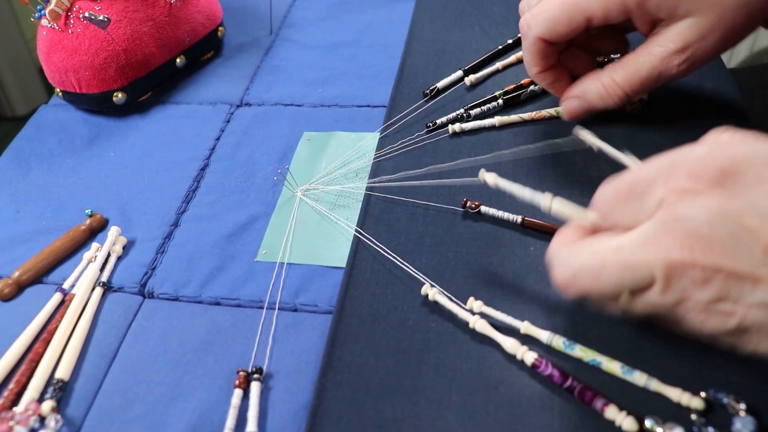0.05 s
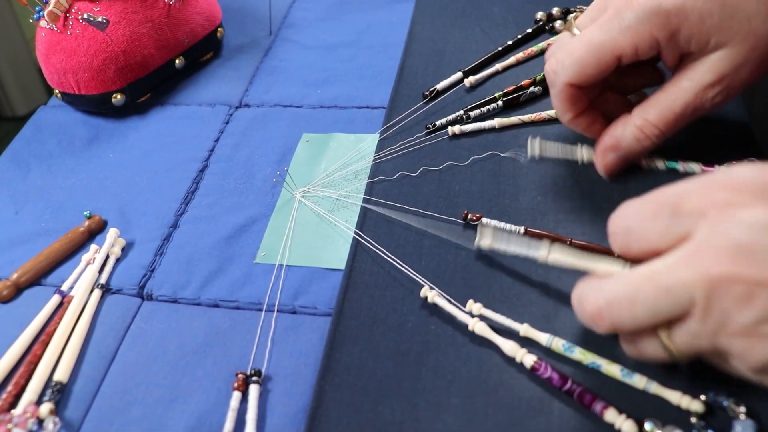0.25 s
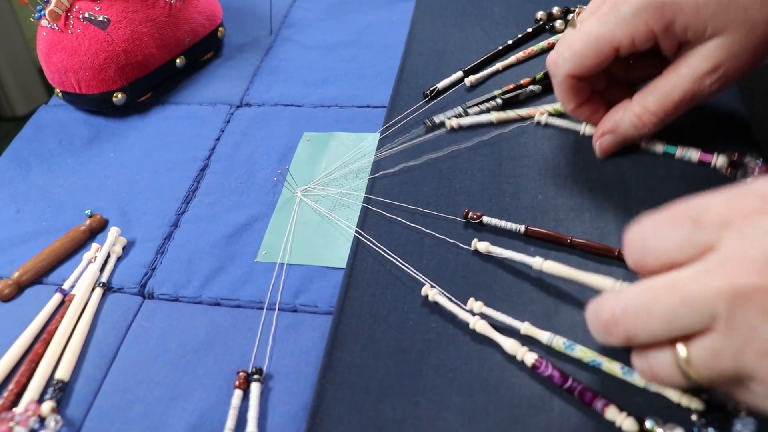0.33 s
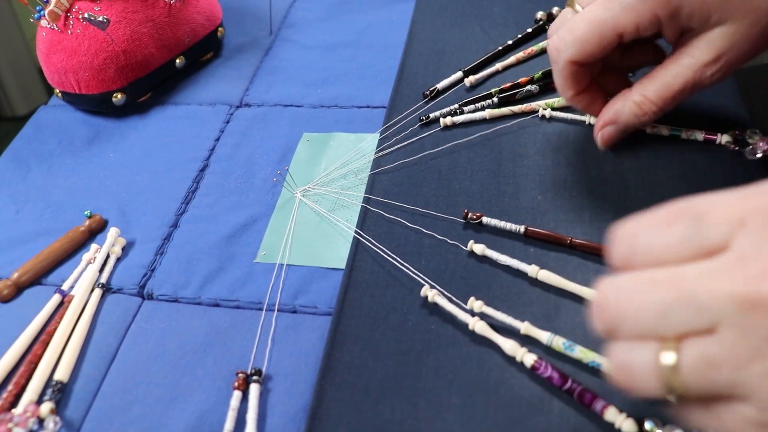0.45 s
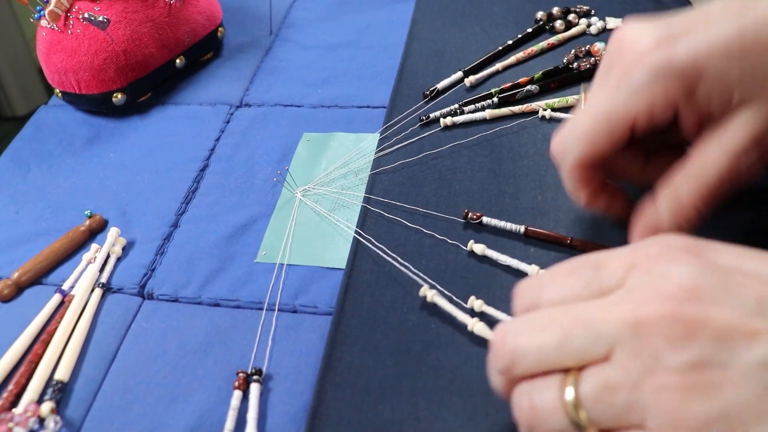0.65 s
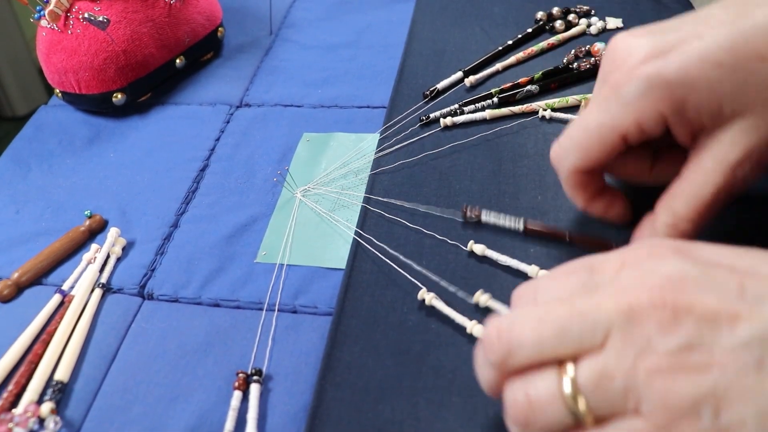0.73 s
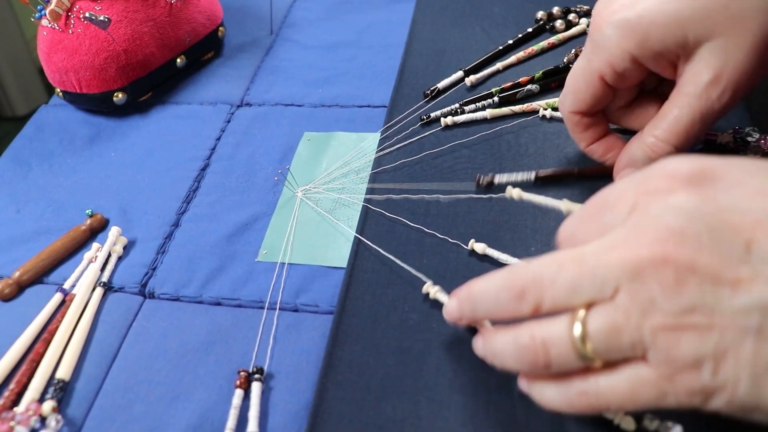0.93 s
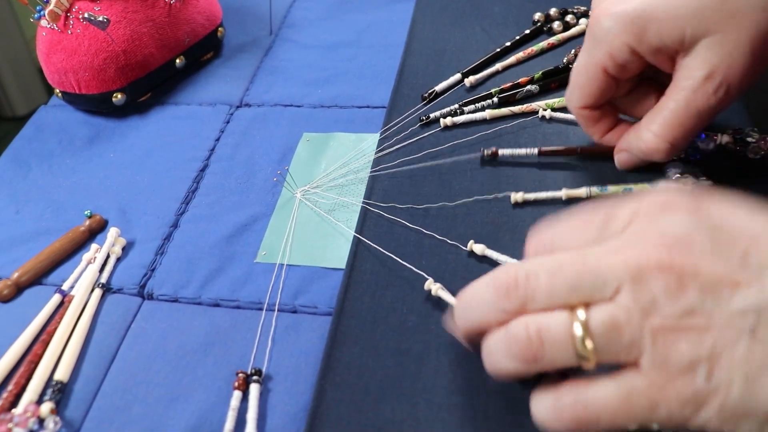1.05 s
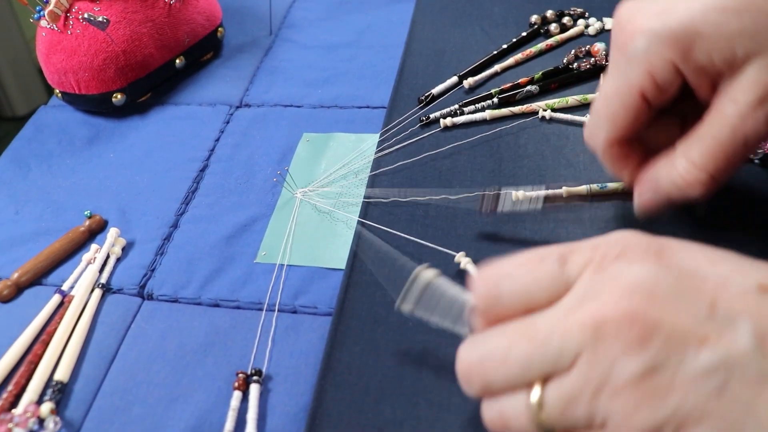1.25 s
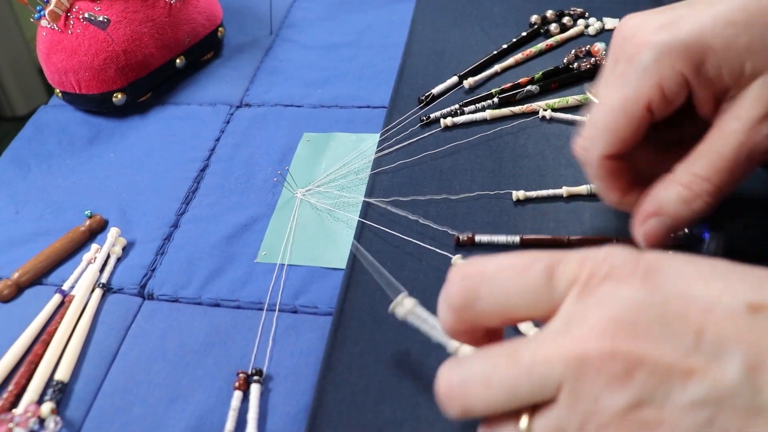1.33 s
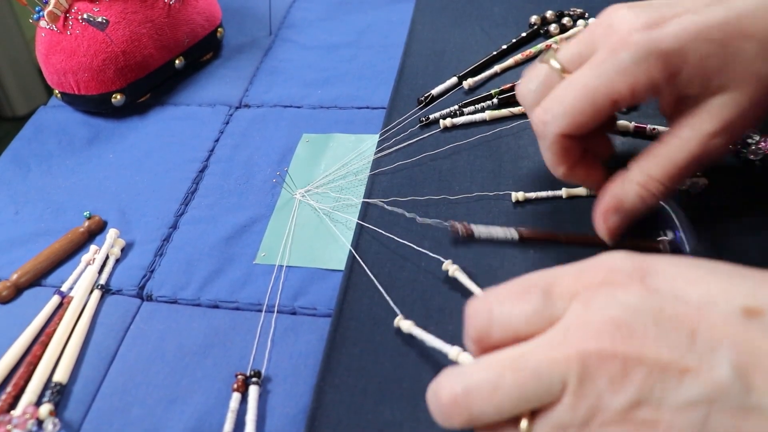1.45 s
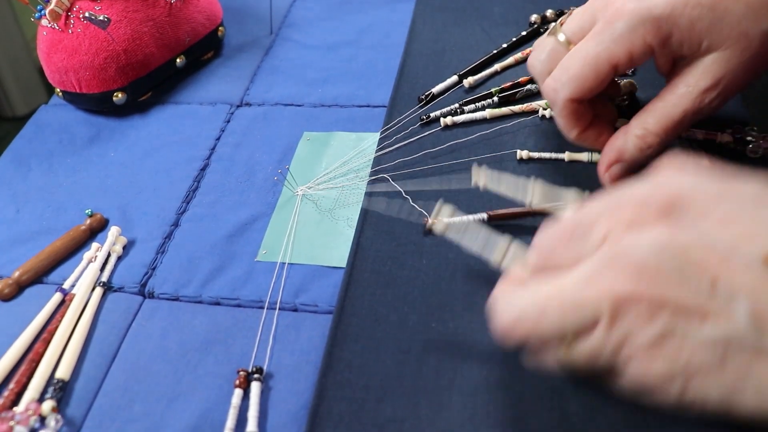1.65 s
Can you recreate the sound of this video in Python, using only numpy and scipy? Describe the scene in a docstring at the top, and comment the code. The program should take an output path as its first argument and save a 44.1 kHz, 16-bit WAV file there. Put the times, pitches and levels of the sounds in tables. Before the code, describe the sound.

Wooden lace bobbins knock dully and click together on a cloth-covered pillow, with glassy bead chinks

```python
"""Wooden lace bobbins knock dully on a cloth-covered lace pillow, close by and a little to the right.
Each knock is a padded two-partial thud with an edge tick and the damped modes of the pillow.
Shafts clack together as noise cracks with short modes; glass beads chink as high, brief modes.
Hands and bobbins brush over the cloth in grainy noise, with skids and soft presses, in a small room."""
import sys
import numpy as np
from scipy import signal
from scipy.fft import rfft, irfft, next_fast_len
from scipy.io import wavfile
from scipy.ndimage import map_coordinates

SR = 44100
rng = np.random.default_rng(int(sys.argv[2]) if len(sys.argv) > 2 else 0)


def unload_audio(sound):
    """Save the sound as a 16-bit wav file, at the path given as the first command line argument."""
    columns = np.transpose(np.atleast_2d(sound))
    # keep every value between -1 and 1, then stretch to whole-number steps
    steps = np.round(np.clip(columns, -1, 1) * 32767)
    wavfile.write(sys.argv[1], SR, steps.astype(np.int16))


N = 74970
T = np.arange(SR // 2) / SR  # time within one blow, s
SCENE_T = np.arange(N) / SR  # time within the scene, s
EAR = np.array([[-.5], [.5]])  # left, right: halves a left-right difference between the channels


def amp(db):
    """Decibels to gain."""
    return 10 ** (np.asarray(db) / 20)


def unit(x):
    """Scale to rms 1."""
    return x / np.sqrt(np.mean(x ** 2) + 1e-20)


def along(points, hz):
    """Interpolate (Hz, value) points along a log frequency axis."""
    f, v = np.transpose(points)
    return np.interp(np.log(hz + 1), np.log(f + 1), v)


def fade(t60):
    """Exponential decay that falls 60 dB in t60 seconds."""
    return amp(-60 * T / t60)


def filtered(x, response):
    """Multiply the spectrum of x by a response of frequency; zero padding gives the tail room."""
    n = x.shape[-1]
    m = next_fast_len(n + 8192)
    hz = np.fft.rfftfreq(m, 1 / SR)
    return irfft(rfft(x, m) * response(hz), m)[..., :n]


def add(out, s, x):
    """Mix x into out from time s."""
    i = max(0, round(s * SR))
    n = min(x.shape[-1], N - i)
    out[:, i:i + n] += x[:, :n]


def knocks():
    """A bobbin lands: a padded thud, a tick of its edge and the short ring of the pillow."""
    # bobbins landing on the pillow (t/s, level/dB, pitch f/Hz, overtone/dB, edge tick/dB, ring/dB)
    landings = [(0.2305, -4.5, 641, -11, -26, -0.5), (0.2916, -13, 667, -8, -19, -7.5),
                (0.3503, -16, 640, -10, -28, -7), (0.3617, -21, 630, -7.5, -21.5, 0.5),
                (1.1095, -8.5, 695, -14, -30, -7.5), (1.1796, -27, 450, -1, -35, -9),
                (1.418, -17.5, 419, -37, -24, -1), (1.574, -34, 402, -6, -29, 4)]
    # modes of the pillow and its stand (f/Hz, level/dB, t60/s)
    pillow_modes = [(178.7, -28.5, 0.23), (233, -29, 0.24), (398, -10, 0.032), (521.4, -11, 0.068),
                    (661, -37, 0.3), (726.4, -20, 0.12), (1215, -29.5, 0.088), (1410, -26.5, 0.15)]
    # colour of the edge tick (f/Hz, level/dB)
    tick_colour = [(300, -7), (1200, -3), (2200, 3), (5000, -2.5), (11000, -13.5), (16000, -16)]
    peak_cycles, shape = 0.66, 2.27  # the thud peaks within its first cycle; a higher shape narrows it
    overtone_ratio = 1.866  # second partial of the thud over its pitch
    ring_rise_cycles = 0.53  # the pillow takes up its ring while the thud lasts
    tick_t60_s, room_db = 0.011, -8
    out = np.zeros((2, N))
    for s, db, hz, overtone_db, tick_db, ring_db in landings:
        age = hz * T / peak_cycles
        swell = (age * np.exp(1 - age)) ** shape
        fundamental = np.sin(2 * np.pi * hz * T)
        overtone = amp(overtone_db) * np.sin(2 * np.pi * overtone_ratio * hz * T)
        thud = swell * (fundamental + overtone)

        # a padded blow hardly excites modes above the thud's overtone
        softened = []
        for f, level, t60 in pillow_modes:
            loss_db = 10 * np.log10(1 + (f / (overtone_ratio * hz)) ** 12)
            softened.append((f, level - loss_db, t60))
        rise = 1 - np.exp(-(hz * T / ring_rise_cycles) ** 2)
        body = ring(softened, scatter_db=1.5, detune=.004) * rise

        tick = crack(tick_colour, tick_t60_s)
        blow = thud + amp(ring_db) * body + amp(tick_db) * tick
        add(out, s, amp(db) * placed(blow, room_db))
    return out


def clicks():
    """Thin shafts touch: a crack and a few milliseconds of ring, coloured by where they meet."""
    # shafts clicking together
    # (t/s, level/dB, centre f/Hz, -3 dB half-width/octaves, t60 of the crack/s, added room/dB)
    touches = [(.002, -42.5, 7900, 0.85, .03, 13.5), (0.1457, -46.5, 9900, 2.4, 0.033, 13),
               (.426, -15.5, 6560, 0.57, 0.0083, 2), (.4915, -40, 7000, 1.1, .012, 0),
               (0.6926, -31.5, 3820, 0.85, 0.017, 9), (0.829, -43, 9000, 1.4, 0.0049, 13),
               (1.0842, -31, 8100, 2.4, 0.0082, -8), (1.0855, -27.5, 7950, 1, 0.011, -5),
               (1.1119, -25.5, 9900, 2.1, 0.011, 4), (1.1401, -9.5, 12400, 0.3, 0.0083, -1),
               (1.188, -9, 14000, 0.63, 0.0048, -0.5), (1.2726, -17.5, 8600, 0.59, 0.0088, 0),
               (1.2966, -14, 9800, 1.17, 0.004, 4.5), (1.2972, -26, 4070, 0.36, 0.0075, -13),
               (1.4011, -32, 6960, 2.6, 0.0071, 7), (1.419, -31, 10400, 1.5, 0.039, 1.5),
               (1.5185, -36.5, 9200, 0.6, 0.011, 4), (1.5499, -42.5, 2000, 2.8, 0.014, 0),
               (1.562, -39, 7000, 1, 0.0094, -7), (1.596, -29.5, 7000, 0.77, 0.012, -4),
               (1.618, -30, 8700, 0.6, 0.011, 8), (1.627, -27.5, 8060, 0.43, 0.0054, 7),
               (1.669, -37.5, 8500, 0.91, .01, -9)]
    # modes of a clicking shaft (f/Hz, level/dB, t60/s)
    shaft_modes = [(4050, -15, .007), (5850, -14, .007), (6700, -14, .007), (8400, -15, .006),
                   (9550, -12, .007), (11200, -18, .005), (13500, -17, .005)]
    # colour of the crack (f/Hz, level/dB)
    crack_colour = [(200, -9), (1500, 7.5), (2800, 1), (4200, 1.5), (9000, 1.5), (12000, -2.5),
                    (16000, -3.5)]
    base_room_db = -9
    out = np.zeros((2, N))
    for s, db, centre_hz, octaves, t60, room_db in touches:
        contact = crack(crack_colour, t60) + ring(shaft_modes, scatter_db=1.5, detune=.035)

        def band(hz):
            offset = np.log2((hz + 1) / centre_hz) / octaves
            return 1 / np.sqrt(1 + offset ** 4)

        add(out, s, amp(db) * placed(filtered(contact, band), base_room_db + room_db))
    return out


def chinks():
    """Glass beads meet: stiff modes ring high and briefly, and the room holds the note."""
    # beads meeting (t/s, level/dB, t60/s, pitch ratio, highest excited f/Hz, added room/dB)
    meetings = [(.4262, -28, 0.0097, .937, 10400, 9), (1.084, -33, 0.0047, 0.63, 12000, -8),
                (1.1391, -13.5, 0.021, 1, 18000, 1.5), (1.1882, -13.5, .012, 1, 18000, 0)]
    # modes of a bead at pitch ratio 1 (f/Hz, level/dB)
    bead_modes = [(6640, -8), (10000, -13), (10200, 0), (14720, -7.5)]
    attack_s, base_room_db = 0.0005, -2.5
    out = np.zeros((2, N))
    for s, db, t60, pitch, top_hz, room_db in meetings:
        modes = []
        for hz, level in bead_modes:
            loss_db = 10 * np.log10(1 + (hz * pitch / top_hz) ** 12)  # the contact excites less above
            modes.append((hz * pitch, level - loss_db, t60))
        attack = 1 - np.exp(-T / attack_s)
        glass = ring(modes, scatter_db=.5, detune=.001) * attack
        add(out, s, amp(db) * placed(glass, base_room_db + room_db))
    return out


def clacks():
    """A firmer contact rings the damped modes of the whole bobbin."""
    # hard wooden clacks (t/s, level/dB)
    hits = [(0.6933, -35), (1.2962, -52)]
    # modes of a whole bobbin (f/Hz, level/dB, t60/s)
    bobbin_modes = [(400, -1, 0.043), (627, -4, 0.037), (1015, 0.5, 0.021), (1380, 0, 0.013),
                    (2470, -5, 0.035), (4600, -6.5, 0.043), (11100, -20, 0.04)]
    out = np.zeros((2, N))
    for s, db in hits:
        wood = ring(bobbin_modes, scatter_db=1, detune=.005)
        add(out, s, amp(db) * placed(wood, room_db=-4.5))
    return out


def ring(modes, scatter_db, detune):
    """Sum damped sine modes, struck a little differently each time in level and pitch."""
    total = 0
    for hz, db, t60 in modes:
        gain = amp(db + scatter_db * rng.normal())
        f = hz * (1 + detune * rng.normal())
        total = total + gain * fade(t60) * np.sin(2 * np.pi * f * T)
    return total


def crack(spectrum, t60):
    """The brief noise of a hard contact: coloured noise that dies away at once."""
    noise = filtered(rng.standard_normal(len(T)), lambda hz: amp(along(spectrum, hz)))
    return unit(noise) * fade(t60)


def brushing(grain_db, grain_hz):
    """Hands and bobbins slide over the weave: cloth-coloured noise with a fine, uneven grain."""
    # strength of the brushing (t/s, level/dB)
    strokes = [(0, -48.5), (.05, -54), (.09, -49), (.13, -54.5), (.165, -60), (.188, -53), (.21, -57.5),
               (.4, -54.5), (.5, -49.5), (.54, -71), (.8, -55.5), (.83, -51.5), (.89, -46.5), (.945, -44.5),
               (1.0, -48), (1.06, -52.5), (1.16, -49), (1.2, -41.5), (1.245, -43), (1.28, -49),
               (1.37, -59.5), (1.54, -57), (1.565, -57), (1.6, -42), (1.64, -48.5), (1.7, -47)]
    # colour of the cloth (f/Hz, level/dB)
    cloth_colour = [(60, -15), (200, -11.5), (400, -2.5), (800, -2), (1250, -2.5), (1800, -8), (3200, -10),
                    (6000, -16), (10000, -17.5), (16000, -35)]
    grain = map_coordinates(rng.standard_normal(N), [SCENE_T * grain_hz], order=1)
    cloth = diffuse(N, lambda hz: amp(along(cloth_colour, hz)))
    level_db = np.interp(SCENE_T, *np.transpose(strokes))
    return amp(level_db) * unit(amp(grain_db * grain) * cloth)


def skids():
    """A bobbin drags over the threads of the weave: a narrow noise band rasps with a gliding pitch."""
    # skids across the cloth
    # (loudest t/s, level/dB, swell time to 1/e/s, pitch f/Hz, glide/octaves per s)
    drags = [(.186, -54, 0.0163, 1600, -19.5), (0.939, -44, 0.047, 1213, 0.5),
             (1.24, -44.5, 0.019, 1540, 9.5), (1.599, -49.5, 0.014, 2670, -9),
             (1.68, -56, 0.026, 1100, 0.5)]
    half_width = 0.17  # half-width of the rasp over its pitch
    out = np.zeros((2, N))
    for s, db, length, hz, glide in drags:
        pitch = hz * 2 ** (glide * np.clip(SCENE_T - s, -2 * length, 2 * length))
        carrier = np.sin(2 * np.pi * np.cumsum(pitch) / SR)
        # slow noise on the carrier makes a noise band around its pitch
        rasp = diffuse(N, lambda f: 1 / (1 + (f / (half_width * hz)) ** 2)) * carrier
        swell = np.exp(-((SCENE_T - s) / length) ** 2)
        out += amp(db) * swell * unit(rasp)
    return out


def presses():
    """A hand leans on the pillow: soft low swells of broad noise around a centre frequency."""
    # presses (loudest t/s, level/dB, swell time to 1/e/s, centre f/Hz)
    leans = [(0.517, -55, 0.013, 200), (1.3, -60, 0.056, 280.8), (1.211, -52, 0.032, 44),
             (1.587, -44, 0.032, 410), (1.65, -66.5, 0.038, 69.9)]
    out = np.zeros((2, N))
    for s, db, length, hz in leans:
        swell = np.exp(-((SCENE_T - s) / length) ** 2)
        noise = diffuse(N, lambda f: 1 / (1 + 4 * np.log((f + 1) / hz) ** 2))
        out += amp(db) * swell * noise
    return out


def placed(x, room_db):
    """A blow heard from the right, with near surfaces and the room answering in decaying noise."""
    # decay time of the room (f/Hz, t60/s)
    room_t60 = [(150, 0.29), (600, 0.2), (2000, 0.17), (7000, 0.32), (10000, 0.23), (15000, 0.25)]
    # right over left in the direct sound (f/Hz, level/dB)
    right_db = [(200, 0.5), (700, 0.5), (2500, 6.5), (6000, 8.5), (12000, 6.5)]
    early_db, early_t60_s, wall_delay_s = -1, 0.064, 0.0016
    right_lead_s = .000083  # the right ear hears the direct sound first
    radiate_hz = 116  # such small objects radiate little below this

    # each band of the late noise decays at its own rate
    hz, t, z = signal.stft(diffuse(len(T), np.ones_like), SR, nperseg=256)
    decayed = z * amp(-60 * t / along(room_t60, hz)[:, None])
    late = signal.istft(decayed, SR, nperseg=256)[1][:, :len(T)]
    early = diffuse(len(T), np.ones_like) * fade(early_t60_s)
    onset = 1 - np.exp(-(T / wall_delay_s) ** 2)
    tail = unit((unit(late) + amp(early_db) * unit(early)) * onset) / np.sqrt(len(T))

    def to_ears(hz):
        lag = np.exp(2j * np.pi * hz * (EAR - .5) * right_lead_s)
        return amp(EAR * along(right_db, hz)) * lag

    radiated = filtered(x, lambda hz: 1j * hz / (radiate_hz + 1j * hz))
    direct = filtered(radiated, to_ears)
    answer = signal.fftconvolve(radiated[None], tail, axes=1)[:, :len(T)]
    return direct + amp(room_db) * answer


def diffuse(size, colour):
    """Stereo noise of rms 1, most alike in the bass, nearly unrelated in the treble, a little to the right."""
    # left-right likeness (f/Hz, correlation)
    alike = [(100, 0.57), (600, 0.72), (1300, 0.45), (2500, 0.1), (5000, 0.017), (15000, 0.018)]

    def mid_side(hz):
        turn = np.arccos(np.clip(along(alike, hz), -1, 1)) / 2
        return colour(hz) * np.array([np.cos(turn), np.sin(turn)])

    mid, side = filtered(rng.standard_normal((2, size)), mid_side)
    right_over_left_db = 1.5
    return unit(np.array([mid + side, mid - side]) * amp(right_over_left_db * EAR))


def room_floor():
    """The quiet room: steady, coloured stereo noise."""
    # colour of the room noise (f/Hz, level/dB)
    floor_colour = [(25, -3), (60, -4), (120, -1), (250, -2), (600, -3.5), (1500, -7), (4000, -9),
                    (10000, -15.5), (16000, -21)]
    return amp(-55) * diffuse(N, lambda hz: amp(along(floor_colour, hz)))


def scene():
    """All contacts, the brushing and the quiet room."""
    contacts = knocks() + clicks() + chinks() + clacks()
    cloth = brushing(grain_db=2.5, grain_hz=449) + skids() + presses()
    return contacts + cloth + room_floor()


def record(dry):
    """Cut the treble very steeply above the band limit."""
    top_hz = 16450
    return filtered(dry, lambda hz: 1 / (1 + (hz / top_hz) ** 120))


dry = scene()
out = record(dry)
unload_audio(out)
```